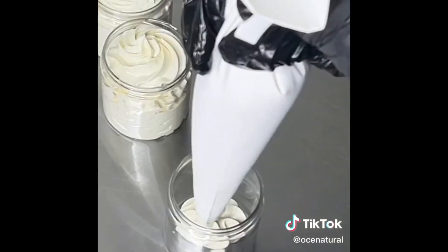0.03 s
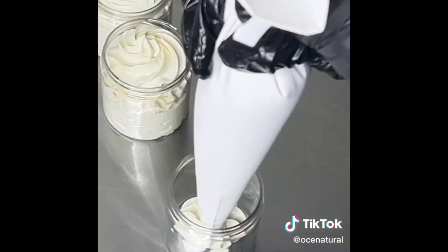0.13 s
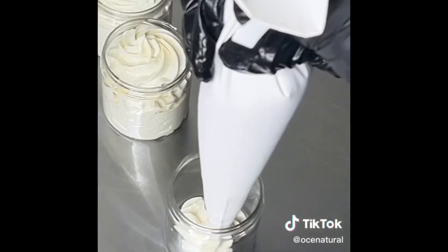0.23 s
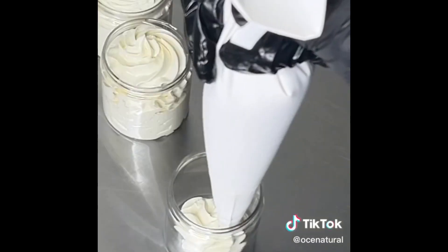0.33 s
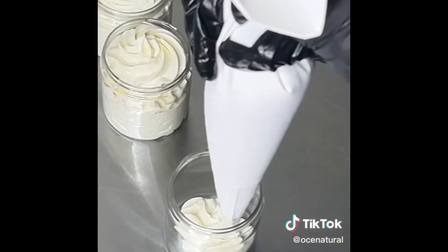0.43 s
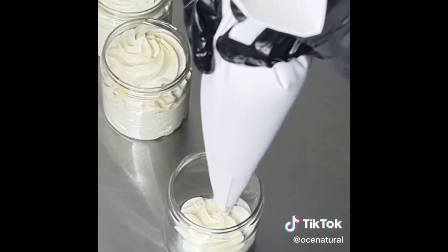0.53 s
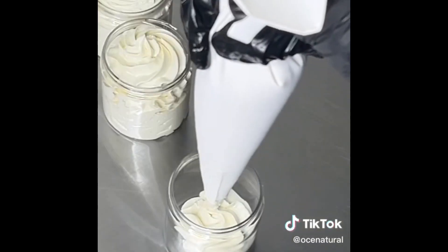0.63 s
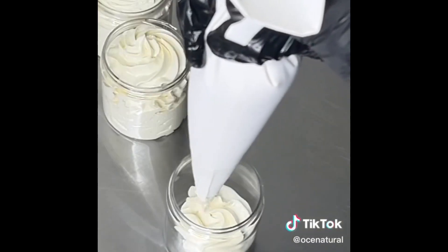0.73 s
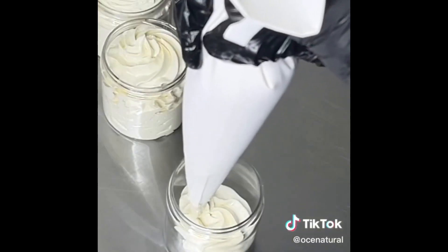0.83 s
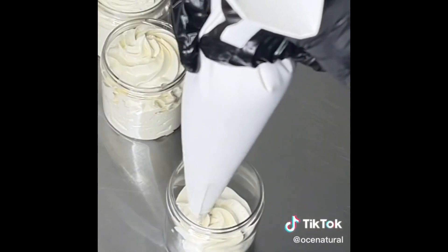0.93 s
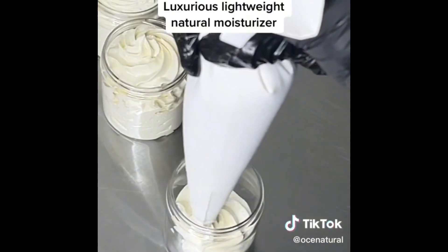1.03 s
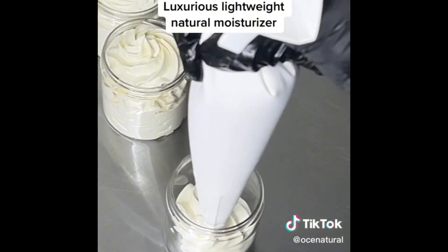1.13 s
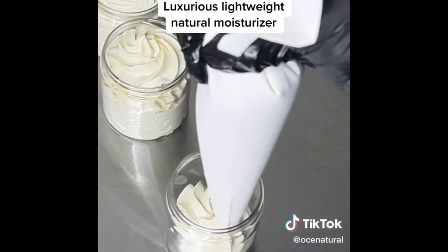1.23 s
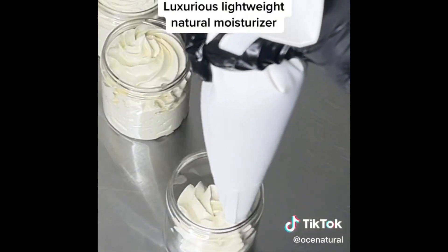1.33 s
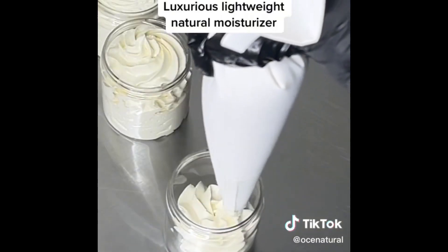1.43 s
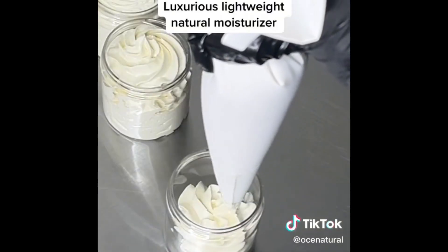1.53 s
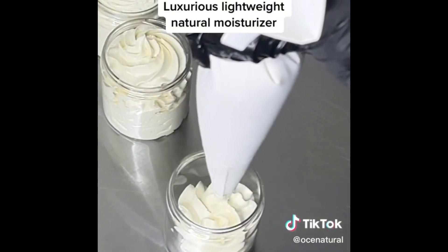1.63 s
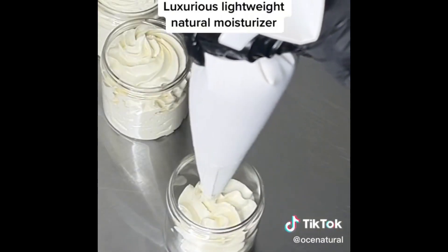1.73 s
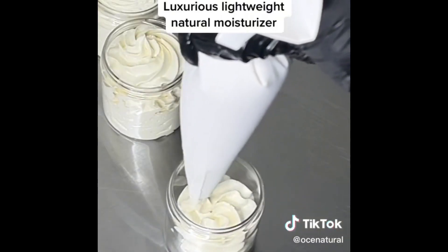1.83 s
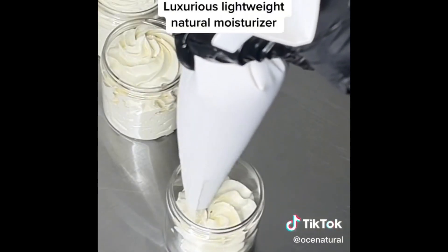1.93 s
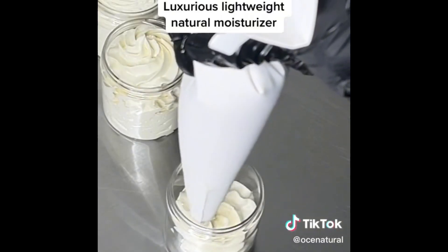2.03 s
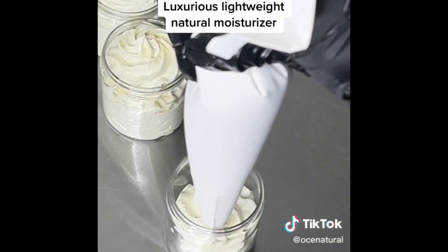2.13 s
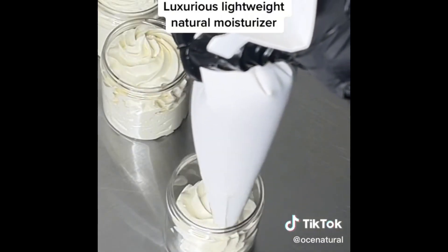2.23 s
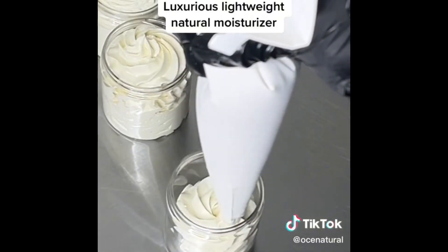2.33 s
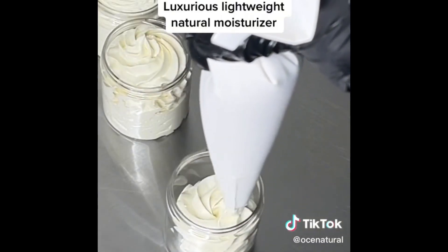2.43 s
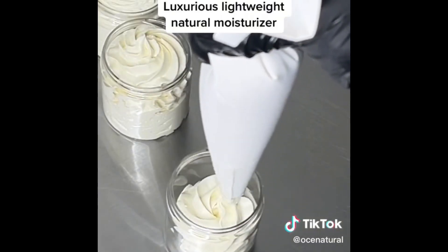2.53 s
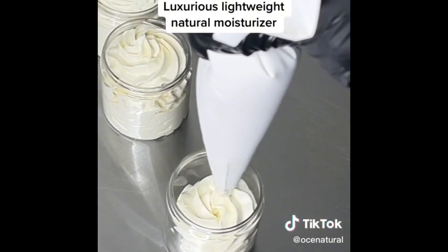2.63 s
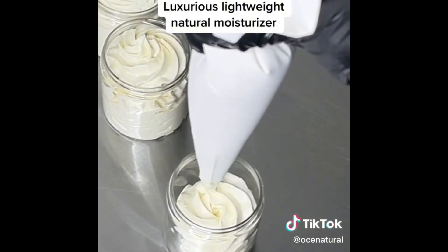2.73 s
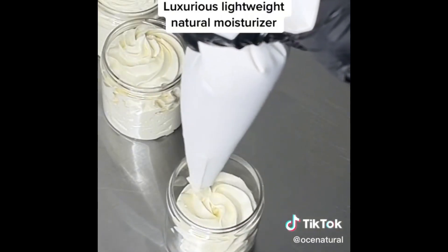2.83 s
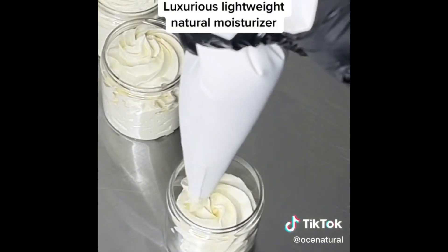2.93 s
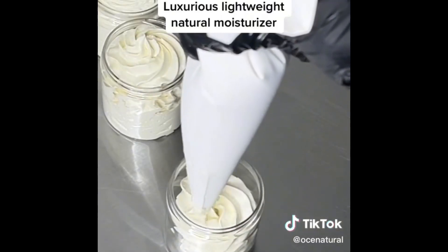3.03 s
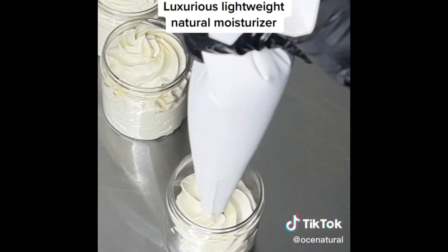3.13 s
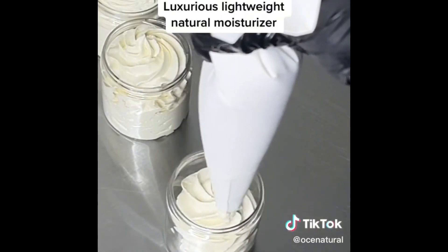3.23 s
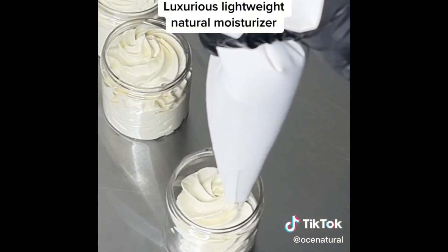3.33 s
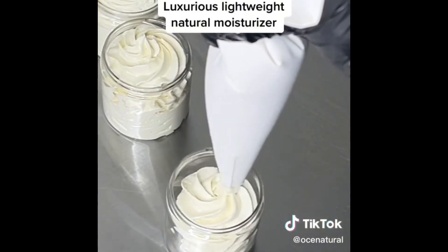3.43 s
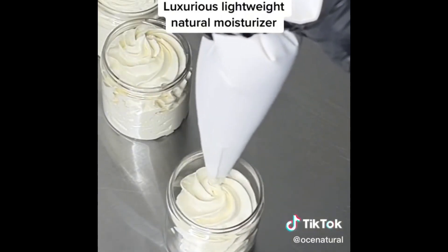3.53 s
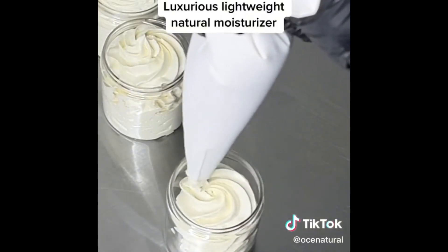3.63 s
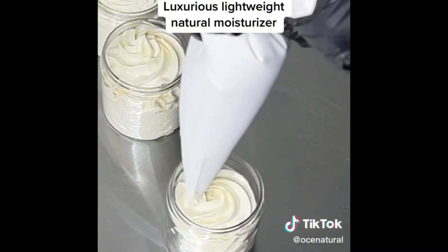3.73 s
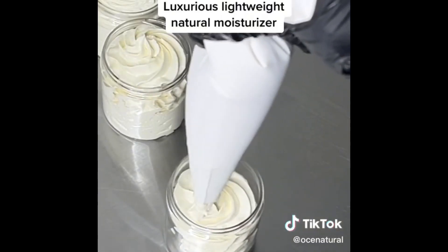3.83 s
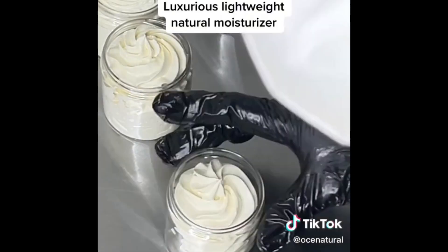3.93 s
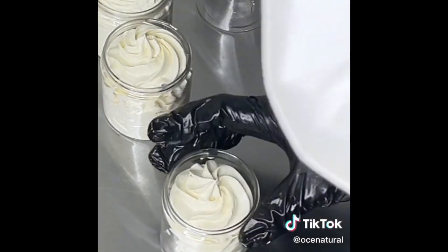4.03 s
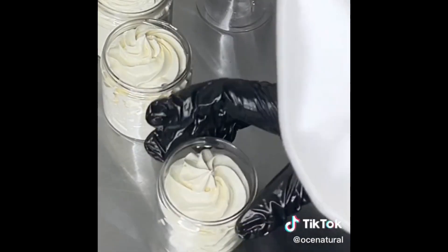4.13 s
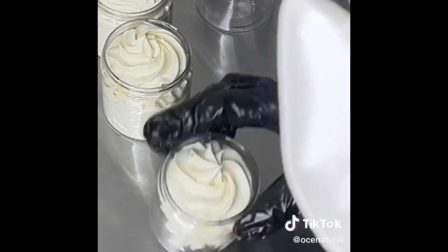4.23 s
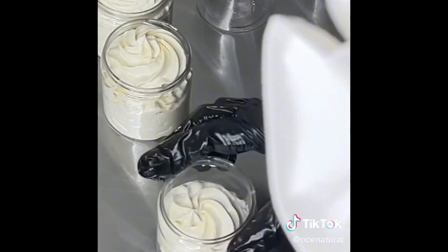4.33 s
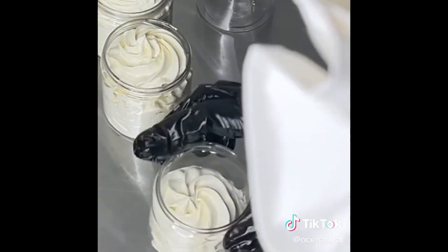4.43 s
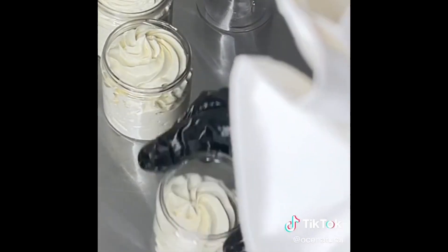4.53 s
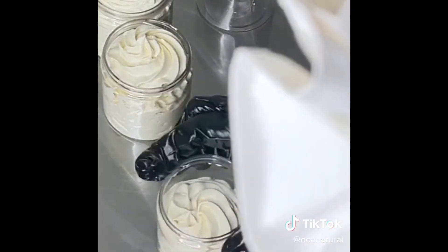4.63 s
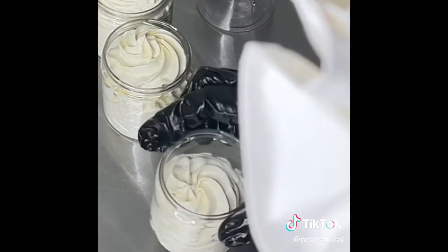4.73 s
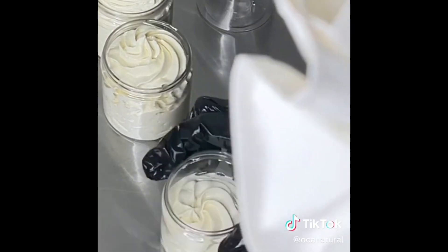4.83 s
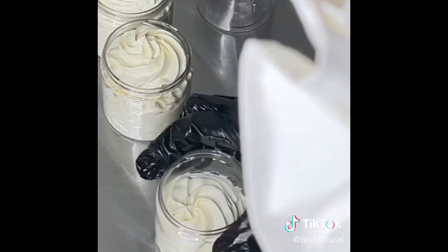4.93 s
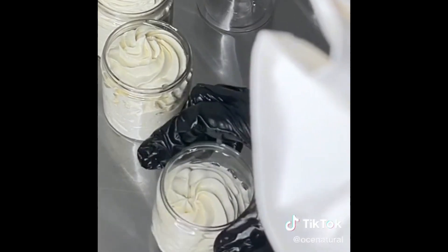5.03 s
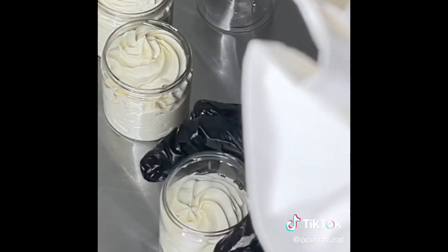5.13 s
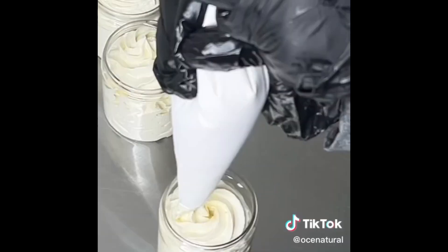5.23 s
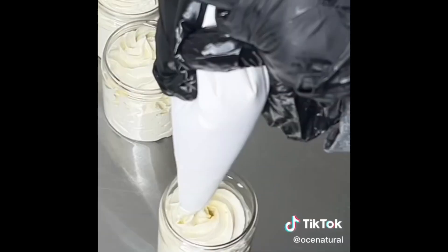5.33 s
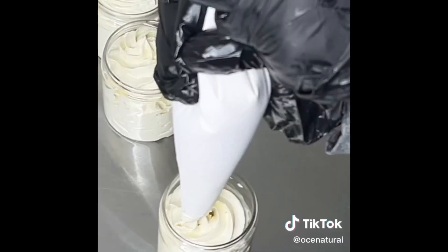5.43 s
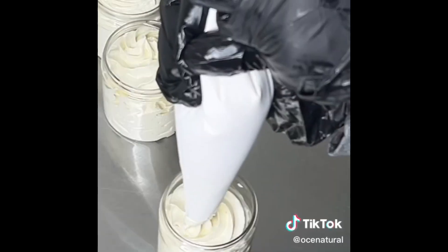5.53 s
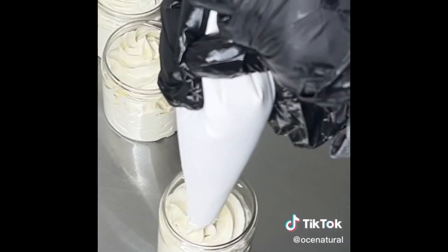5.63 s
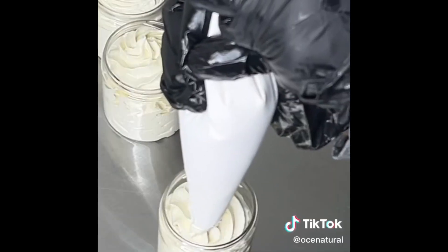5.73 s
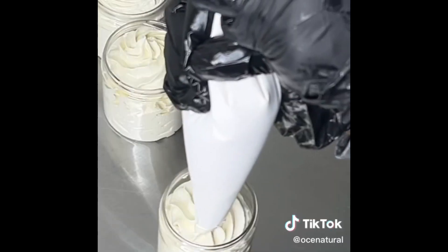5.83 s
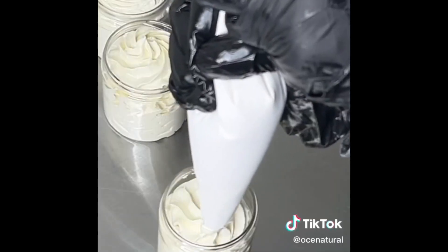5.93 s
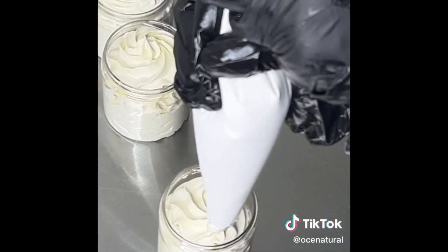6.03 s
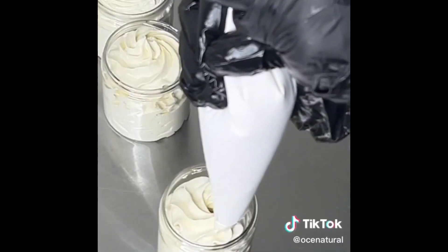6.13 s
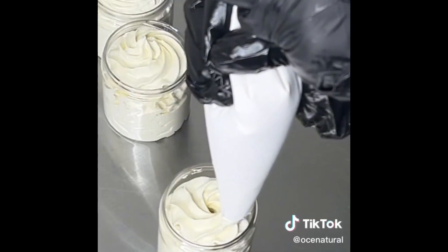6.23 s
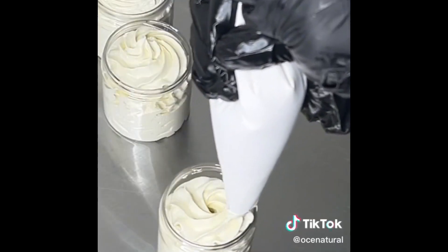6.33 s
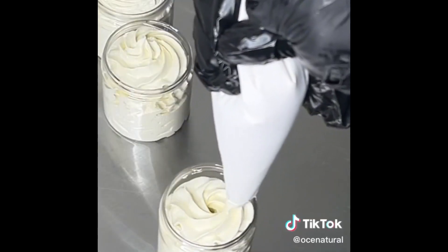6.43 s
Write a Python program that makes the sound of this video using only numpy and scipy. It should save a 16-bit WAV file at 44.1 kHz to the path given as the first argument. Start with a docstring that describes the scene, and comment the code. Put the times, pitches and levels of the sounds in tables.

```python
"""Thick cream is piped from a plastic bag into a jar on a steel table, in a small room, close to a phone's
stereo microphone. Air pockets tear open at the nozzle and ring the air in jar and nozzle, over a fine wet
crackle of tiny bubbles and soft noise squelches. The piping stops short; gloves slide, and the jar is knocked
down four times: damped modes boom the table and ring the glass, and noise clatters round the room.
A cut ends the knocks, and softer piping follows. Low ventilation rumble lies underneath."""
import sys
import numpy as np
from scipy import signal
from scipy.fft import rfft, irfft, next_fast_len
from scipy.io import wavfile

SR = 44100
rng = np.random.default_rng(int(sys.argv[2]) if len(sys.argv) > 2 else 0)


def waveform_to_disk(signal):
    """Save audio, clipped to [-1, 1], as 16-bit WAV at the path in sys.argv[1]."""
    frames = np.transpose(np.atleast_2d(signal))
    scaled = np.clip(frames, -1, 1) * 32767
    samples = np.round(scaled).astype(np.int16)
    wavfile.write(sys.argv[1], SR, samples)


N = 285679  # samples

LIFT_S = 3.865  # the first squeeze is cut off here
EDIT_S = 5.124  # the knocks are cut off and soft piping begins


def undb(db):
    """Decibels to gain."""
    return 10 ** (np.asarray(db) / 20)


def seconds(length):
    """Time axis of a given length in seconds."""
    return np.arange(int(length * SR)) / SR


def fade(t, t60):
    """Exponential decay that falls 60 dB in t60 seconds."""
    return np.exp(-np.log(1000) * t / t60)


def unit(x):
    """Scale to unit energy."""
    return x / np.sqrt(np.sum(x ** 2))


def add(out, s, x):
    """Mix x into out at time s."""
    i = max(int(s * SR), 0)
    out[i:i + len(x)] += x[:max(len(out) - i, 0)]


def colour(x, points):
    """Causal minimum-phase filter with the gain of (Hz, dB) points, built from a folded cepstrum."""
    size = 2 * next_fast_len(len(x))
    point_hz, point_db = np.transpose(points)
    bin_hz = np.arange(size // 2 + 1) * SR / size
    gain_db = np.interp(np.log(bin_hz + 1), np.log(point_hz), point_db)
    cepstrum = irfft(np.log(undb(gain_db)))
    cepstrum[1:size // 2] *= 2
    cepstrum[size // 2 + 1:] = 0
    response = np.exp(rfft(cepstrum))
    return irfft(rfft(x, size) * response)[:len(x)]


def ring(t, modes, detune, scatter_db):
    """Damped modes of alternating sign; each blow shifts and weights them a little differently."""
    total = 0
    for k, (hz, db, t60) in enumerate(modes):
        gain = (-1) ** k * undb(db + scatter_db * rng.standard_normal())
        shifted_hz = hz * (1 + detune * rng.standard_normal())
        total = total + gain * fade(t, t60) * np.sin(2 * np.pi * shifted_hz * t)
    return total


def burst(t, t60, rough):
    """A sharp impulse followed by brief tearing noise."""
    x = rough * unit(rng.standard_normal(len(t)) * fade(t, t60))
    x[0] += 1
    return x


# stereo width of the sound arriving from all round the microphone: (pitch_hz, side_minus_mid_db)
REFLECTION_WIDTH = [(60, -14.5), (200, -14), (600, -9.5), (1100, -3), (2000, -15.5), (3400, -24),
                    (6200, -22), (10000, 1)]


def diffuse(envelope, points):
    """Stereo noise under an envelope: sound arriving from all round."""
    mid = unit(colour(rng.standard_normal(len(envelope)) * envelope, points))
    side = unit(colour(rng.standard_normal(len(envelope)) * envelope, points))
    return mid + colour(side, REFLECTION_WIDTH) * np.array([[1], [-1]])


# room tone levels during the first squeeze and after it
AIR_DB, LATER_AIR_DB = -65.5, -66.5
# the room tone dips briefly before the knocks
DIP_S, DIP_WIDTH_S, DIP_DB = 4.04, 0.11, -11
# spectrum of the room's ventilation rumble: (pitch_hz, relative_level_db)
AIR_SPECTRUM = [(15, -36), (25, -17), (59, -2.5), (266, -8.5), (805, -24), (1770, -25.5), (2000, -20.5),
                (2320, -26.5), (9000, -38), (11700, -68.5), (19800, -120)]


def room_tone():
    """Low ventilation rumble with a weak motor hum and a thin whine; its level dips briefly."""
    t = np.arange(N) / SR
    rumble = np.sqrt(N) * diffuse(np.ones(N), AIR_SPECTRUM)
    hum = undb(-8.5) * np.sin(2 * np.pi * 54 * t)
    whine = undb(-20) * np.sin(2 * np.pi * 1976 * t)
    dip_db = DIP_DB * np.exp(-((t - DIP_S) / DIP_WIDTH_S) ** 2)
    level_db = np.where(t < LIFT_S, AIR_DB, LATER_AIR_DB + dip_db)
    return undb(level_db) * (rumble + hum + whine)


# gloves sliding on the jar: (start_s, length_s, level_db)
GLOVE_SLIDES = [(3.87, 0.078, -76), (4.069, 0.15, -69)]


def gloves():
    """A faint grainy swish of rubber that swells and dies with each slide."""
    # the graininess steps at random every 100 samples
    grain = undb(3 * np.repeat(rng.standard_normal(N // 100 + 1), 100)[:N])
    slides = np.zeros(N)
    for s, length, db in GLOVE_SLIDES:
        swell = np.sin(np.pi * seconds(length) / length)
        add(slides, s, undb(db) * swell)
    swish = diffuse(grain, [(200, 0), (3000, 2.5), (8000, 7.0), (11000, -18)])
    return np.sqrt(N) * slides * swish


# jars touching lightly: (start_s, relative_level_db)
JAR_CLINKS = [(4.634, -1), (4.898, 0.5), (4.994, -5.5)]
# ringing modes of the glass jars: (pitch_hz, relative_level_db, t60_s)
GLASS_MODES = [(1000, 1, .8), (2650, -2, .8), (2738, 1, .8), (5093, -9, .6), (6347, -2, .6), (6450, -4, .3),
               (9819, 2, .45)]


def glass():
    """The jars ring faintly after every knock and touch again in between; reflections make the ring waver."""
    out, t = np.zeros(N), seconds(.6)
    for s, db, *_ in JAR_KNOCKS:
        tone = ring(t, GLASS_MODES, detune=.001, scatter_db=2)
        add(out, s, undb(db - 56.5) * tone)
    for s, db in JAR_CLINKS:
        tone = ring(t, GLASS_MODES, detune=.001, scatter_db=2)
        # a light touch barely wakes the highest ring
        soft_tone = colour(tone, [(6500, 2.5), (10000, -13.5)])
        tick = unit(colour(burst(t, t60=0.072, rough=3), SNAP_SPECTRUM))
        add(out, s, undb(db) * (undb(-59.5) * soft_tone + undb(-28.0) * tick))
    # an almost uncoloured echo
    echo = diffuse(fade(t, 0.65), [(1000, 0.0015), (10000, 0.0017)])
    return out + undb(-10) * signal.fftconvolve(out[None], echo, axes=1)[:, :N]


# jar set down hard on the table, levels relative:
# (start_s, level_db, thud_db, boom_db, crack_pitch_hz)
JAR_KNOCKS = [(4.168, -1.5, -21, -10.5, 2190), (4.4509, 0, 1.5, -2.5, 2730), (4.7161, 0.5, -5, 2.5, 2326),
              (5.0063, -4.5, 0.5, 6.5, 2350)]
# modes of the steel table top: (pitch_hz, relative_level_db, t60_s)
TABLE_TOP_MODES = [(175.6, 4.5, 0.17), (226.5, 0.5, 0.25), (336.6, 2, 0.23), (394, -0.5, 0.27),
                   (462.5, 4, 0.26), (505, 11.5, 0.074), (580, 3, 0.16), (790, -2, 0.25), (1013, -10, 0.23),
                   (1094, -4.5, 0.16)]
# modes of the table frame: (pitch_hz, relative_level_db, t60_s)
TABLE_FRAME_MODES = [(54.3, -4.5, 0.5), (78.4, -2, 0.19), (110, 3.5, 0.14)]
# spectrum of the crack of jar on steel: (pitch_hz, relative_level_db)
CRACK_SPECTRUM = [(80, -17), (300, -2.5), (700, 3), (1300, -6), (2400, -12), (3200, -16), (7000, -23),
                  (11000, -30.5)]
# spectrum of the loose table's clatter: (pitch_hz, relative_level_db)
CLATTER_SPECTRUM = [(35, -24), (60, -19), (108, -12), (206, -2), (284, -2.5), (411, -0.5), (954, -5),
                    (1380, -5.5), (1670, -12.5), (2360, -12), (3890, -21), (6530, -20), (10500, -34),
                    (13600, -71), (22000, -120)]


def knocks():
    """Each blow cracks, booms the steel top and thuds the frame; the loose table clatters into the room."""
    out, t = np.zeros((2, N)), seconds(.6)
    for s, db, thud_db, boom_db, crack_hz in JAR_KNOCKS:
        crack = unit(colour(burst(t, t60=0.046, rough=3), CRACK_SPECTRUM))
        base = unit(np.sin(2 * np.pi * crack_hz * t) * fade(t, .014))
        # the heavy parts swing up gradually
        swing_up = 1 - fade(t, 0.024)
        boom = unit(ring(t, TABLE_TOP_MODES, detune=.008, scatter_db=3) * swing_up)
        thud = unit(ring(t, TABLE_FRAME_MODES, detune=.03, scatter_db=1.5) * swing_up)
        direct = undb(4.5) * crack + undb(-3) * base
        direct += undb(5.5 + boom_db) * boom + undb(-3.0 + thud_db) * thud
        # reflections keep arriving for a moment before the sound dies away
        dying = fade(np.maximum(t - .03, 0), 0.26) + undb(-19) * fade(t, 0.88)
        envelope = dying * (1 - fade(t, 0.016))
        for channel, clatter in zip(out, diffuse(envelope, CLATTER_SPECTRUM)):
            add(channel, s, undb(db) * (direct + undb(8.5) * clatter))
    return out


def between(modes, share):
    """Modes part of the way from their empty to their full state."""
    return [(f0 + share * (f1 - f0), d0 + share * (d1 - d0), t60) for f0, f1, t60, d0, d1 in modes]


# relative hollow ring of a pop: in the empty jar, its loss as the cream rises, and under gentle pressure
HOLLOW_DB, HOLLOW_LOSS_DB_PER_S, GENTLE_HOLLOW_DB = 5.5, 4, -5


def hollowness(s):
    """Relative dB of the jar's hollow ring: the rising cream deadens it steadily; gentle piping fixes it."""
    return GENTLE_HOLLOW_DB if s > EDIT_S else HOLLOW_DB - HOLLOW_LOSS_DB_PER_S * s


# the jar's ring shifts as it fills; the nozzle's sooner, as its tip sinks into the cream
JAR_FULL_S, TIP_BURIED_S = 3.28, 1.6
# air in the jar: (empty_pitch_hz, full_pitch_hz, t60_s, empty_level_db, full_level_db)
JAR_AIR_MODES = [(374, 260, 0.0032, -7.5, -1.5), (662, 610, 0.0066, 5, 2), (935, 835, 0.012, 4.5, -5.5),
                 (1035, 915, 0.0094, 2, -12.5)]
# air in the nozzle: (empty_pitch_hz, full_pitch_hz, t60_s, empty_level_db, full_level_db)
NOZZLE_AIR_MODES = [(1440, 1494, 0.011, 0, -3), (1810, 1897, 0.012, -2.5, 5), (2460, 2360, 0.018, 2, -2.5),
                    (3050, 2890, 0.0045, 6.5, 1)]
# spectrum of a bubble's snap, also of a glass tick: (pitch_hz, relative_level_db)
SNAP_SPECTRUM = [(1200, -3), (3000, -0.5), (4500, 2), (6500, -4.5), (8000, -0.5), (11000, -21)]


def pop(s, hollow_db, snap_db, pitch=1):
    """A bubble tears open and rings the air in jar and nozzle, whose resonances shift as the cream rises."""
    t = seconds(0.024)
    jar_modes = between(JAR_AIR_MODES, min(s / JAR_FULL_S, 1) ** 4)
    nozzle_modes = between(NOZZLE_AIR_MODES, min(s / TIP_BURIED_S, 1) ** 2)
    tear = burst(t, t60=.009, rough=.7)
    hollow = ring(t, jar_modes, detune=.05, scatter_db=2)
    # a higher nozzle pitch also dies faster
    nozzle = ring(t * pitch, nozzle_modes, detune=.04, scatter_db=2)
    hollow = unit(signal.fftconvolve(hollow, tear)[:len(t)])
    nozzle = unit(signal.fftconvolve(nozzle, tear)[:len(t)])
    snap = unit(colour(burst(t, t60=0.028, rough=5.9), SNAP_SPECTRUM))
    return undb(hollow_db + 2.0) * hollow + nozzle + undb(snap_db + 1.0) * snap


# the first small bubbles of a squeeze snap brighter, and this soon wears off
FRESH_DB, FRESH_DECAY_S = 9, 1
# small bubbles differ in pitch over this range; the faintest lie this far under the boldest
BUBBLE_OCTAVES, BUBBLE_RANGE_DB = 0.58, 21


def crackle(flow, per_second, gain_db, snap_db):
    """Tiny bubbles at random moments, each with its own pitch and colour: most are faint, a few stand out."""
    out = np.zeros(N)
    times, flow_db = np.transpose(flow)
    span = times[-1] - times[0]
    for when, size, hollow, snap, pitch in rng.random((int(per_second * span), 5)):
        elapsed = when * span
        s = times[0] + elapsed
        db = np.interp(s, times, flow_db) + BUBBLE_RANGE_DB * size ** 2 + gain_db
        hollow_db = hollowness(s) + 8 * (hollow - .5)
        bright_db = snap_db + FRESH_DB * np.exp(-elapsed / FRESH_DECAY_S) + 18 * (snap - .5)
        bubble = pop(s, hollow_db, bright_db, 2 ** (BUBBLE_OCTAVES * (pitch - .5)))
        add(out, s, undb(db) * bubble)
    return out


# soft squelches of cream folding onto itself: (start_s, level_db, pitch_hz, length_s)
CREAM_SQUELCHES = [(0.32, -29, 144, 0.032), (1.245, -31, 140, 0.035), (1.442, -22, 1774, 0.36),
                   (1.47, -25.5, 284.7, 0.413), (2.4, -40, 370, 0.035), (3.385, -26.5, 240, 0.052)]


def squelches():
    """Folding cream smears noise round one pitch, which falls as the pocket opens."""
    out = np.zeros(N)
    for s, db, hz, length in CREAM_SQUELCHES:
        t = seconds(length)
        band = [(hz / 2, -24), (.8 * hz, -8), (hz, 0), (1.2 * hz, -9), (2 * hz, -28), (10 * hz, -70)]
        smear = colour(rng.standard_normal(len(t)) ** 3, band)
        # warped time lowers the pitch, fastest in the short squelches
        opened = t / length
        falling = np.interp(t + .025 * opened * (1 - opened), t, smear)
        add(out, s, undb(db) * unit(falling * np.sin(np.pi * opened)))
    return out


# the harder a pocket bursts, the more the nozzle outweighs the jar:
# a usual pop's table level, and hollow dB lost per dB above it
USUAL_POP_DB, HOLLOW_LAG = -44.5, 0.36
GENTLE_FLOW_DB = -70.5  # relative, like the levels of the hard flow
# the larger air pockets bursting at the nozzle: (start_s, relative_level_db, relative_snap_db)
AIR_POCKETS = [(0.0382, -45, 0.5), (0.292, -52, 0), (0.3224, -39, 2.5), (0.3686, -40.5, -2.5),
               (0.4401, -52, 1), (0.4845, -34.5, 0), (0.7564, -47.5, -12), (0.8079, -40.5, -1),
               (0.9383, -41.5, -10), (1.0455, -46, -3.5), (1.2107, -42, -11), (1.2525, -30, -8),
               (1.3531, -49, -5.5), (1.5041, -40, -18), (1.7835, -47.5, -9.5), (1.978, -41, -9.5),
               (2.0616, -47.5, -3), (2.2164, -37, -6), (2.34, -46, -10.5), (2.47, -47.5, -14),
               (2.4919, -33, -5), (2.5366, -43, -5.5), (2.6529, -46.5, -12.5), (2.6894, -50.5, -9),
               (2.9175, -36, -10), (3.1544, -49, -18), (3.2345, -44.5, -3), (3.25, -47, -6),
               (3.2691, -47, -14), (3.3194, -43, -25), (3.5121, -47.5, -9), (3.5656, -45, -8),
               (3.591, -49, -20), (3.6333, -48.5, -12.5), (3.678, -39.5, -9.5), (3.698, -39.5, -12.5),
               (3.8065, -46.5, -5.5), (3.8438, -46, -7.5), (5.735, -57, 10.5), (5.7569, -55, 9.5),
               (5.877, -60, -1), (5.9633, -53, -4), (6.1617, -51.5, -1)]
# cream leaving the nozzle under hard pressure: (start_s, relative_crackle_db)
HARD_FLOW = [(0.0, -67), (0.32, -62.5), (0.43, -60), (1.59, -62.5), (1.99, -64.5), (3.1, -67.5),
             (3.42, -58), (3.68, -62), (3.86, -88)]


def piping():
    """Loud pops, fine crackle and smeared squelches, echoed by the room."""
    gentle_flow = [(EDIT_S, GENTLE_FLOW_DB), (N / SR, GENTLE_FLOW_DB)]
    out = crackle(HARD_FLOW, per_second=110, gain_db=12.0, snap_db=-11)
    out += crackle(gentle_flow, per_second=36, gain_db=-6, snap_db=3)
    for s, db, snap_db in AIR_POCKETS:
        hollow_db = hollowness(s) - HOLLOW_LAG * (db - USUAL_POP_DB)
        add(out, s, undb(db + 19.5) * pop(s, hollow_db, snap_db))
    out += squelches()
    t = seconds(.45)
    room_spectrum = [(50, -16.5), (130, 12.0), (400, 3.0), (1000, 2.5),
                     (2500, -2), (5000, 0), (8000, 0), (11000, 3)]
    room = diffuse(fade(t, 0.35) * (1 - fade(t, 0.011)), room_spectrum)
    return out + undb(-3.5) * signal.fftconvolve(out[None], room, axes=1)[:, :N]


def scene():
    """Piping, then the knocks, then soft piping; cuts end the echo of the first two."""
    t = np.arange(N) / SR
    first_squeeze = np.clip((LIFT_S - t) / 0.015, 0, 1)
    knocking = np.clip((EDIT_S - t) / 0.033, 0, 1) ** 2 * (1 - first_squeeze)
    piped = (first_squeeze + (t > EDIT_S)) * piping()
    knocked = knocking * (knocks() + glass() + gloves())
    return piped + knocked + room_tone()


TOP_HZ = 11100  # upper limit of the microphone


def record(dry):
    """The phone thins the deepest bass, rounds the loudest peaks and cuts the top."""
    thin = signal.sosfilt(signal.butter(3, 38, "high", fs=SR, output="sos"), dry)
    rounded = np.tanh(3 * thin) / 3
    return signal.sosfilt(signal.ellip(10, .2, 70, TOP_HZ, fs=SR, output="sos"), rounded)


dry = scene()
out = record(dry)
waveform_to_disk(out)
```